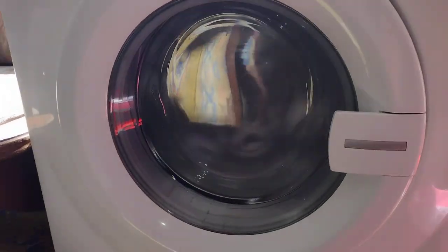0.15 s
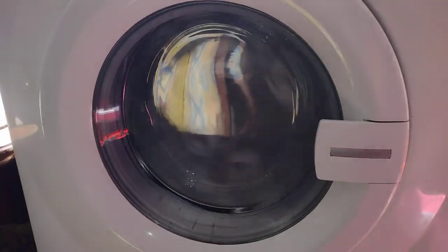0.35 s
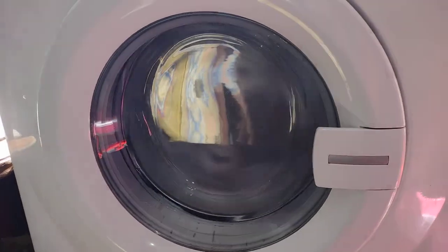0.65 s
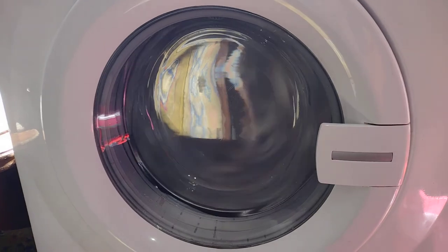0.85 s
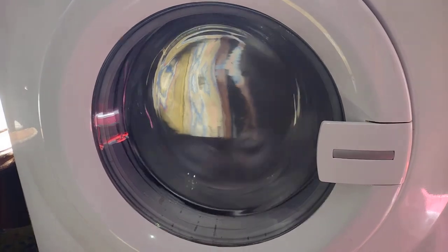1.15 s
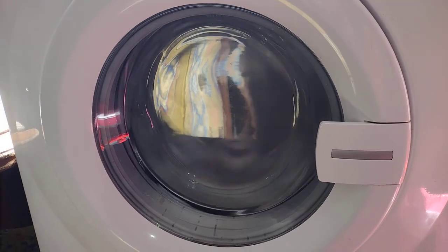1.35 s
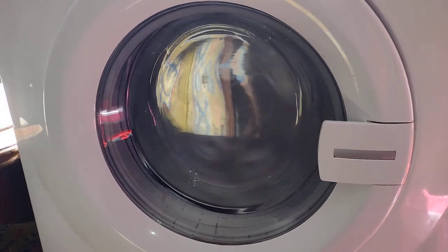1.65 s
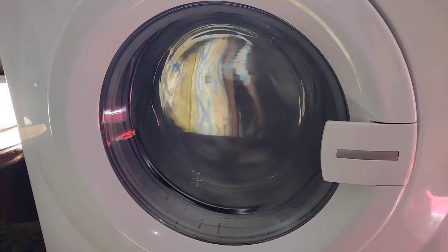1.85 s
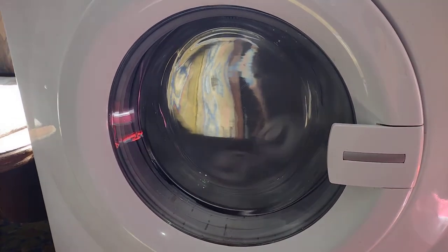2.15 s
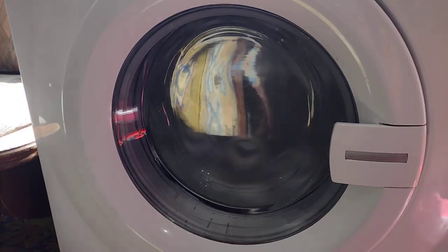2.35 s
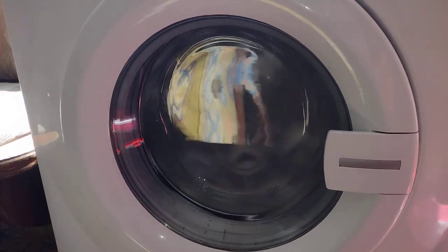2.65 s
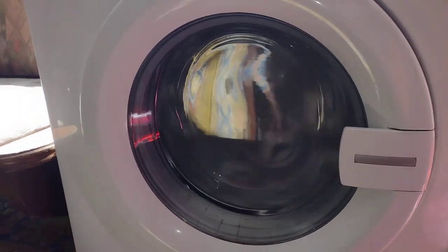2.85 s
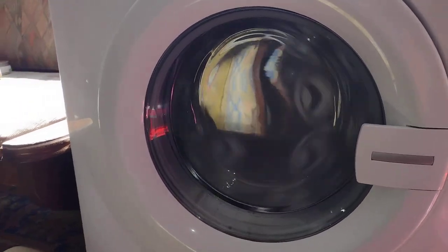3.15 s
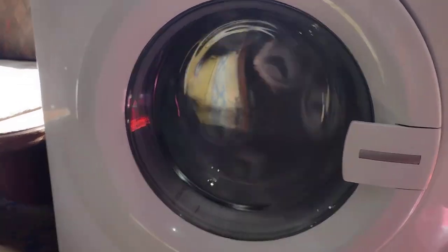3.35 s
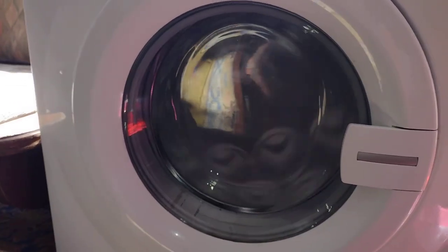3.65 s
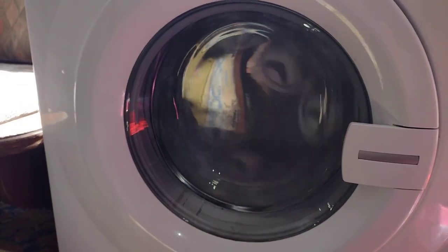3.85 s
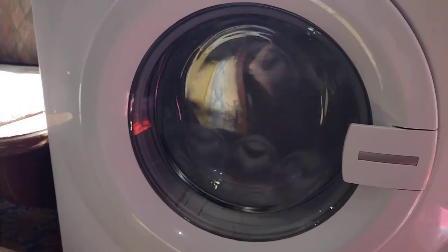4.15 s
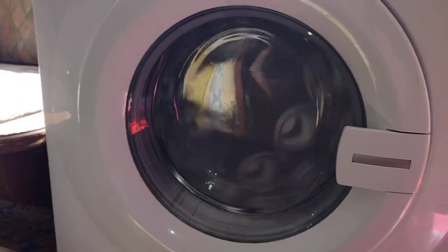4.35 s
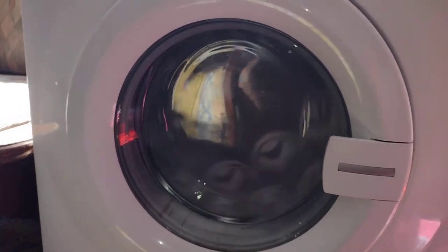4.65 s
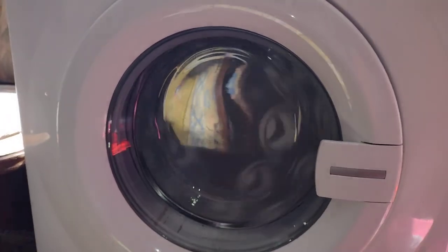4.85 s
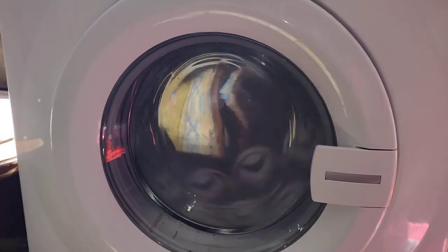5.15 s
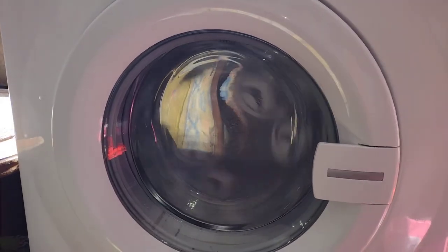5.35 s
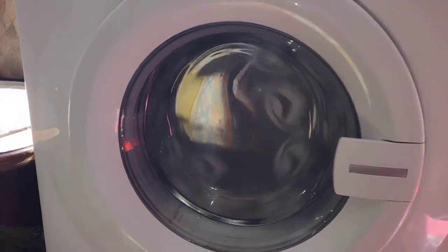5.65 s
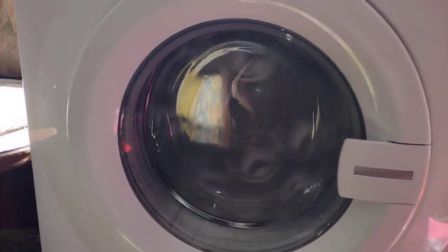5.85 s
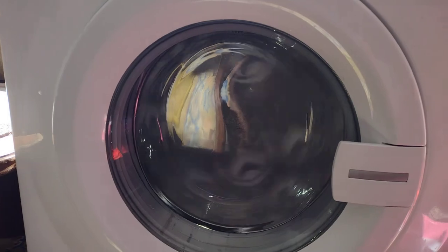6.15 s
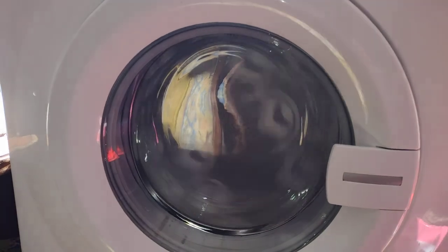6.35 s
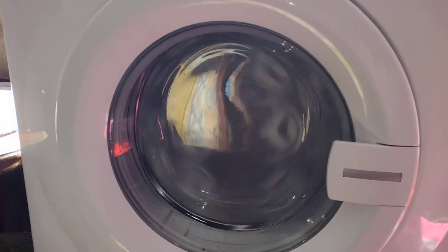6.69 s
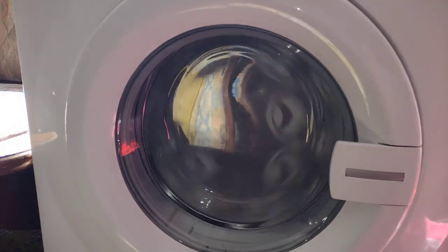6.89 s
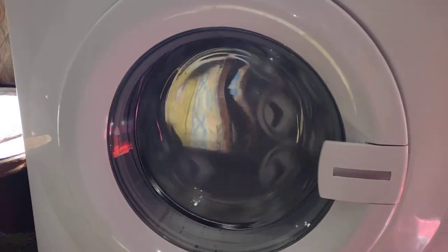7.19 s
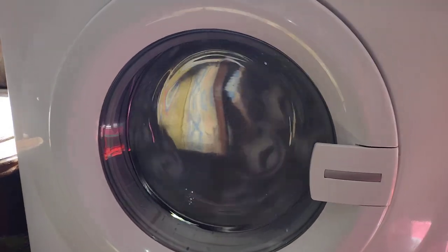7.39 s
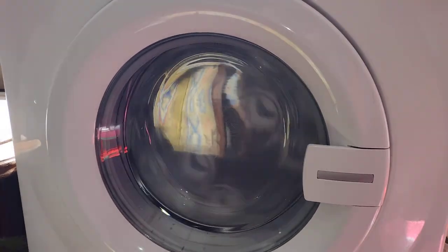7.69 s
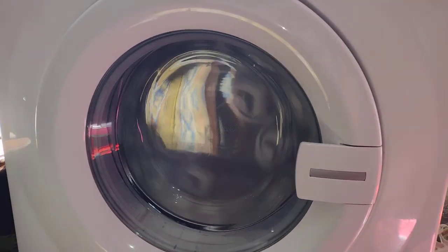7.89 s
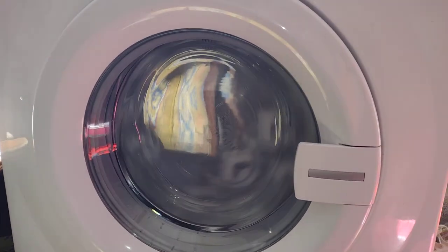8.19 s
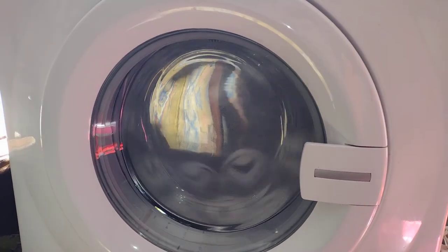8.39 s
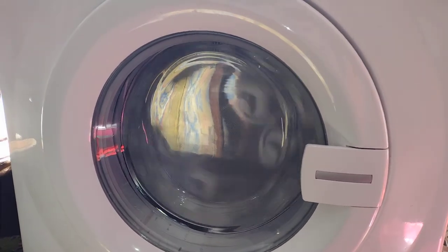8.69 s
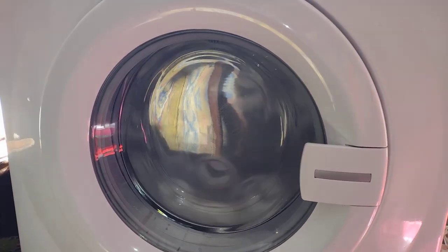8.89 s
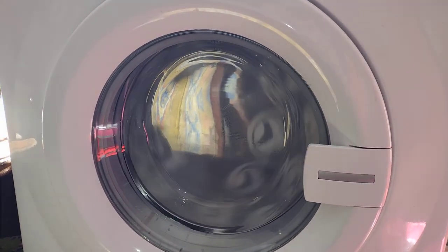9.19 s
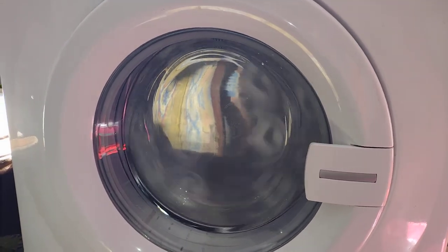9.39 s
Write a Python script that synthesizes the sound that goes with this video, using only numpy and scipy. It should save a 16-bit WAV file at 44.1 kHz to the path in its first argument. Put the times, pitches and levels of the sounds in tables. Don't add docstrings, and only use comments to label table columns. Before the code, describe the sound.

A washing machine drum's low rumble swells, throbs with a gap and soft knock each turn, then slowly fades under rustling and sharp plastic ticks.

```python
import sys
import numpy as np
from scipy import signal
from scipy.fft import rfft, irfft, next_fast_len
from scipy.io import wavfile
from scipy.ndimage import uniform_filter1d

SR = 44100
rng = np.random.default_rng(int(sys.argv[2]) if len(sys.argv) > 2 else 0)


def field_ratio(decibels):
    return 10 ** (np.asarray(decibels, dtype=float) / 20)


def to_wav(sig):
    pcm = np.clip(np.atleast_2d(sig), -1, 1) * 32767
    pcm = np.round(pcm).astype(np.int16)
    wavfile.write(sys.argv[1], SR, pcm.T)


N = 420273


def read(points, hz, column=1):
    table = np.transpose(points)
    return np.interp(np.log(hz + 1), np.log(table[0] + 1), table[column])


def evened(x):
    return x / np.sqrt(np.mean(x ** 2) + 1e-20)


def coloured(gain):
    re, im = rng.standard_normal((len(gain), 2)).T
    return evened(irfft(gain * (re + 1j * im)))


def wander(t, top_hz):
    hz = np.geomspace(.4, top_hz, num=16)
    sines = np.sin(2 * np.pi * (hz * t[:, None] + rng.random(16)))
    return evened((sines / np.sqrt(hz)).sum(axis=1))


# time in seconds, turns made, lift of the uneven load off the bearings in dB.
DRUM_TURNS = [(.049, 0, 2), (.742, 4, 7), (1.493, 8, 3), (1.665, 9, 8), (2.064, 11, 6.5), (2.482, 13, 10.5),
              (2.687, 14, 6), (3.116, 16, 10.5), (3.566, 18, 9.5), (3.813, 19, 9), (4.028, 20, 4.5),
              (4.52, 22, 6.5), (4.8, 23, 1.5), (5.571, 26, 3.5), (7.14, 31, 3.5), (8.856, 36, 4)]
HARD_LANDINGS = {4: -3, 8: -3, 10: -2, 11: -7, 12: -2, 13: 1, 15: -1, 16: -2, 18: -6, 19: 0, 22: -5, 31: -9}


def turns():
    s, made, lift_db = np.transpose(DRUM_TURNS)
    number = np.arange(np.ceil(made[0]), made[-1] + .5)
    knock_db = [HARD_LANDINGS.get(round(n), -18) for n in number]
    return np.interp(number, made, s), np.interp(number, made, lift_db), np.array(knock_db)


def speed(t):
    s = turns()[0]
    return np.interp(t, (s[:-4] + s[4:]) / 2, 4 / (s[4:] - s[:-4]))


def drop_outs(t, fall_s, rise_s):
    s, lift_db, _ = turns()
    lag = t[:, None] - s
    width_s = np.where(lag < 0, fall_s, rise_s)
    return (lift_db * np.exp(-(lag / width_s) ** 2)).sum(axis=1)


def knocks(t, delay_s, decay_s):
    s, _, knock_db = turns()
    u = np.maximum(t[:, None] - s - delay_s, 0) / decay_s
    return (field_ratio(knock_db) * u * np.exp(1 - u)).sum(axis=1)


# time in seconds, shake of the panels in dB.
ROLLING_SHAKE = [(0.0, -33.5), (0.45, -29.5), (0.75, -27.5), (1.1, -22.5), (1.3, -20.5), (2.2, -22),
                 (3.6, -22), (3.9, -22.5), (4.3, -22), (5.3, -24), (5.7, -23), (6.35, -24), (6.7, -25.5),
                 (7.05, -25), (7.4, -27.5), (8.1, -29), (8.8, -29.5), (9.53, -32)]
# offset in dB, rise in dB per further turn a second,
# quiet speed in turns a second, loss at that speed in dB.
RANGE_RESPONSE = [
    (-10.5, -1.8, 3.3, 4),
    (0, 0, 4.9, .3),
    (-7, 2.8, 4.3, 1.5),
    (-26.5, .5, 4.15, 5),
]
RANGE_HZ = [130, 350, 750, 1500]
# centre in Hz, width in Hz, level over that of its range in dB.
CABINET_MODES = [(81, 14, -28), (99, 32, -14.5), (96, 37, -4.5), (148.9, 16.6, 6), (212.8, 23, -3.5),
                 (265, 33.3, -2), (305.7, 43, -4.5), (346.1, 47.6, -2), (374.3, 38.3, -1.5), (465.3, 37, 2),
                 (531, 34, -2), (586.3, 46, -4), (683, 42.3, -3.5), (786.7, 84, -5), (885, 63, -11.5),
                 (1010.7, 72, -2.5), (1071, 97, -4.5), (1237, 36, -7.5), (1344, 50, -0.5), (1453, 92, -1.5),
                 (1590, 180, -2.5), (1651, 61, -2), (1780, 97, -9.5), (1930, 220, -5.5), (2130, 180, -18)]


def machine():
    step = 8
    size = next_fast_len(N // step + 1, real=True) // 2 * 2 + 2
    t, hz = np.arange(size) * step / SR, np.fft.rfftfreq(size, step / SR)
    coarse = t[::16]

    base_db, slope_db, quiet, quiet_db = np.transpose(RANGE_RESPONSE)[:, :, None]
    turns_a_second = speed(coarse)
    ranges_db = np.interp(coarse, *np.transpose(ROLLING_SHAKE)) + base_db + slope_db * (turns_a_second - 4)
    ranges_db = ranges_db - quiet_db * np.exp(-((turns_a_second - quiet) / .35) ** 2)

    lost_db = drop_outs(coarse, fall_s=0.028, rise_s=0.017)
    landing = knocks(coarse, delay_s=0.017, decay_s=0.0062)
    jolts = uniform_filter1d(rng.standard_normal(len(coarse)), size=8)
    jolts_db = 1.6 * evened(jolts - uniform_filter1d(jolts, size=120))

    out = np.zeros(size)
    for centre, width, db in CABINET_MODES:
        ring = coloured(1 / (1 + ((hz - centre) / (0.64 * width)) ** 2))
        share = [np.interp(np.log(centre), np.log(RANGE_HZ), row) for row in np.eye(4)]
        felt = np.interp(centre, [100, 300, 1500], [.3, 1.05, .9])
        level_db = share @ ranges_db + .9 * wander(coarse, 9) - felt * lost_db
        level_db = level_db + jolts_db * np.exp(-(np.log(centre / 900) / .45) ** 2)
        struck = 1 + 1.8 * landing * np.exp(-(np.log(centre / 800) / .3) ** 2)
        mode_db = db - 3.5 + 10 * np.log10(width / 40)
        out += ring * np.interp(t, coarse, field_ratio(level_db + mode_db) * struck)
    return signal.resample(out, size * step)[:N]


# frequency in Hz, level in dB per Hz.
HISS_SPECTRUM = [(1000, -4.5), (3000, -6), (8000, 3), (12000, 6.5), (14000, 5), (15000, 4.5), (15700, 7)]
# time in seconds, gain in dB.
GAIN_SETTLING = [(0, -4), (.5, -5), (.9, -3), (1.3, 0)]


def hiss():
    size = next_fast_len(N, real=True) // 2 * 2 + 2
    hz = np.fft.rfftfreq(size, 1 / SR)
    noise = coloured(field_ratio(read(HISS_SPECTRUM, hz)) * (hz > 300))
    gain_db = np.interp(np.arange(N) / SR, *np.transpose(GAIN_SETTLING))
    return noise[:N] * field_ratio(-47.5 + gain_db)


# frequency in Hz, level in dB per Hz.
CLOTH_SPECTRUM = [(1200, -8.5), (2500, 4), (4000, 1), (6000, -2), (8000, -5.5), (10500, -14.5),
                  (14000, -11), (20000, -27)]
# start in seconds, length in seconds, level in dB, brightness in dB.
CLOTH_STROKES = [(2.495, 0.29, -66, -8), (3.02, .18, -73, -10), (3.403, .16, -76.5, -9.5),
                 (4.674, .13, -70.5, -5.5), (4.865, 0.34, -68, -7.5), (5.221, 0.27, -66.5, -3),
                 (5.55, .28, -66, -1), (5.899, 0.24, -66, -5), (6.197, .28, -71, -7.5),
                 (6.523, 0.32, -72.5, -4.5), (6.89, .4, -71, -7.5)]


def rustle():
    size = next_fast_len(N, real=True) // 2 * 2 + 2
    t, hz = np.arange(size) / SR, np.fft.rfftfreq(size, 1 / SR)
    snap_db = 0.92 * rng.exponential(1, size // 64 + 1).repeat(64)[:size]
    slips = rng.standard_normal(size) * field_ratio(snap_db)
    spectrum = rfft(evened(slips)) * field_ratio(read(CLOTH_SPECTRUM, hz))
    upper = 1 / (1 + (4900 / (hz + 1)) ** 6)
    low, high = irfft(spectrum * (1 - upper)), irfft(spectrum * upper)

    dull = field_ratio(np.interp(t, [0, 1.25], [-80, -72.5])) ** 2
    bright = dull * field_ratio(-8) ** 2
    rise_s, fall_s = 0.065, 0.11
    for s, length, db, bright_db in CLOTH_STROKES:
        power = field_ratio(db) ** 2 * np.interp(t - s, [0, rise_s, length, length + fall_s], [0, 1, 1, 0])
        catching = field_ratio(1.1 * wander(t[::256], 40)).repeat(256)[:size]
        power = power * catching ** 2
        dull, bright = dull + power, bright + power * field_ratio(bright_db) ** 2
    rubbing = evened(low) * np.sqrt(dull) + field_ratio(7) * evened(high) * np.sqrt(bright)
    return (field_ratio(18) * rubbing)[:N]


# start in seconds, length in seconds, frequency in Hz, level in dB.
SEAM_CREAKS = [
    (0.307, .005, 3500, -49),
    (0.314, .005, 3300, -49),
    (2.34, .14, 3200, -58),
    (3.2145, .003, 2750, -36),
    (3.218, .002, 3400, -46),
    (4.88, 0.14, 3350, -54),
    (5.84, .05, 4430, -56),
]


def squeaks():
    out = np.zeros(N)
    for s, length, hz, db in SEAM_CREAKS:
        t = np.arange(round(length * SR)) / SR
        unsteady_hz = hz * (1 + .0004 / length * wander(t, 8 / length))
        tone = np.sin(2 * np.pi * np.cumsum(unsteady_hz) / SR)
        out[round(s * SR):][:len(t)] += field_ratio(db) * tone * np.hanning(len(t)) ** .5
    return out


# start in seconds, number of ticks, first gap in seconds, peak in dB.
CASE_STUTTERS = [
    (4.7242, 2, .0026, -51),
    (5.9027, 5, .006, -47),
    (6.6454, 2, .0036, -50),
    (6.6666, 1, 0, -49),
    (6.7607, 1, 0, -49),
]


def stutters():
    shrink, rise_ms = .68, .04
    rows = []
    for s, slips, gap_s, db in CASE_STUTTERS:
        for k in range(slips):
            delay_s = gap_s * (1 - shrink ** k) / (1 - shrink)
            rows.append((s + delay_s, db, rise_ms))
    return rows


# time in seconds, peak in dB, rise time in milliseconds.
CASE_TICKS = [(1.2108, -54, .035), (1.214, -55, .035), (2.9796, -50, .08), (2.9873, -41, .09),
              (2.9891, -48, .08), (3.0864, -51, .08), (3.4597, -50, .07), (4.7012, -49, .06),
              (4.7182, -46, .08), (4.7399, -47, .035), (4.7419, -42, .09), (4.7661, -48, .08),
              (4.7734, -47, .06), (5.0555, -41, .09), (7.5642, -41, .11), (7.9003, -51, .09),
              (7.9211, -51, .07), (8.4676, -37, .115), (8.9006, -48, .08)]
# time in seconds, peak in dB, rise
# time in milliseconds.
CASE_LOUD_TICKS = [
    (4.7138, -29.5, .09),
    (4.7147, -36, .11),
    (4.7155, -33, .14),
    (7.8666, -27.5, .088),
    (7.86845, -31, .09),
    (7.87215, -37, .13),
]


def ticks():
    out, ms = np.zeros(N + 400), np.arange(400) / SR * 1000
    ring_hz, ring_t60_s = 1000, .004
    ring = field_ratio(-13 - .06 * ms / ring_t60_s) * np.sin(2 * np.pi * ring_hz * ms / 1000)
    ring = ring * (1 - np.exp(-(ms / .15) ** 2))
    for s, db, rise_ms in CASE_TICKS + stutters() + CASE_LOUD_TICKS:
        u = ms / (2 * rise_ms)
        jump = (u * np.exp(1 - u)) ** 6
        out[round(s * SR):][:400] -= field_ratio(db + 8) * (jump + ring)
    return np.diff(out, prepend=0)[:N] * SR / MEAN_NULLS[1][0]


def scene():
    return np.tile(machine() + rustle() + ticks() + hiss() + squeaks(), (2, 1))


# left null in Hz, right null in Hz, # left and right signed share (at most
MEAN_NULLS = [(0, 0, 0, 0), (2545, 2385, .18, .26), (5165, 4720, .28, .25), (7730, 7085, .04, .25),
              (10190, 9410, -.12, .42), (12560, 11900, -.45, .58), (14700, 14320, -.4, .98),
              (17000, 16700, -.4, .9)]


def running_mean(hz, side):
    nulls = np.transpose(MEAN_NULLS)
    turn = np.pi * np.interp(hz, nulls[side], np.arange(len(MEAN_NULLS)))
    uneven = np.interp(hz, nulls[side], nulls[side + 2]) * np.tanh(turn / np.pi)
    return (np.sin(turn) - 1j * uneven * np.cos(turn)) / (turn * np.sinc(hz / SR))


# frequency in Hz, level in dB, phase in radians.
RIGHT_AGAINST_LEFT = [(500, 3.5, -0.031), (1020, 3.5, 0.011), (1470, 2.1, -0.31), (1880, -7.5, -.2),
                      (2800, 2.5, 0.39), (6500, 4, 0.34), (9000, 6, 0), (11300, 5, 0), (14000, 3, 0)]


def right_colour(hz):
    lag_s = 8.5e-6
    phase = read(RIGHT_AGAINST_LEFT, hz, column=2) - 2 * np.pi * hz * lag_s
    return field_ratio(read(RIGHT_AGAINST_LEFT, hz)) * np.exp(1j * phase)


def top_cut(x):
    return signal.sosfilt(signal.butter(12, 15910, fs=SR, output="sos"), x)


def record(dry):
    size = next_fast_len(N + 4000, real=True)
    hz = np.fft.rfftfreq(size, 1 / SR) + 1e-3
    low_cut_hz = 91
    band = (1 / np.sqrt(1 + (low_cut_hz / hz) ** 14) + field_ratio(-24)) * (hz < 15740)
    out = []
    for side, colour in enumerate([1, right_colour(hz)]):
        converter_noise = field_ratio(-110) * rfft(rng.standard_normal(size))
        padded = np.pad(dry[side], (2000, size - N - 2000), "reflect")
        heard = rfft(padded) * running_mean(hz, side) * colour * field_ratio(-2)
        out.append(irfft((heard + converter_noise) * band, size)[2000:][:N])
    return top_cut(np.array(out))


dry = scene()
out = record(dry)
to_wav(out)
```